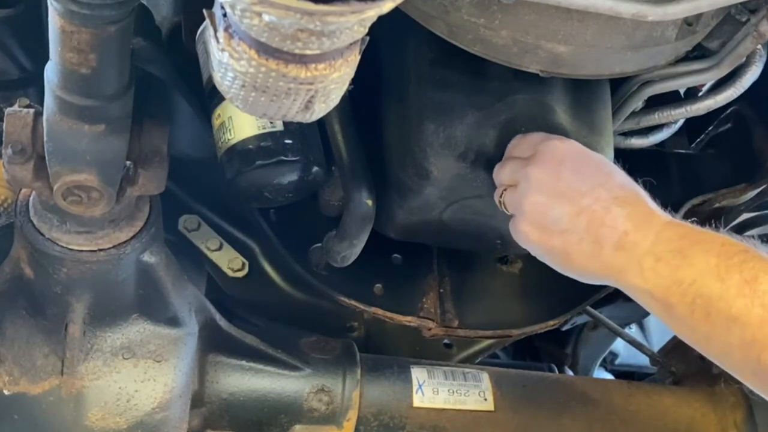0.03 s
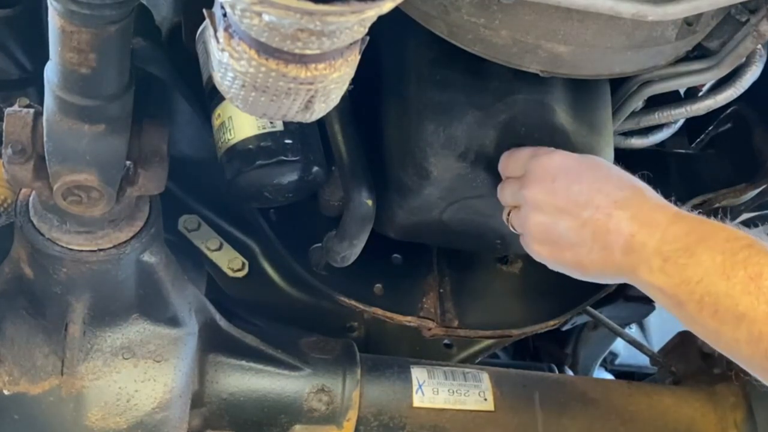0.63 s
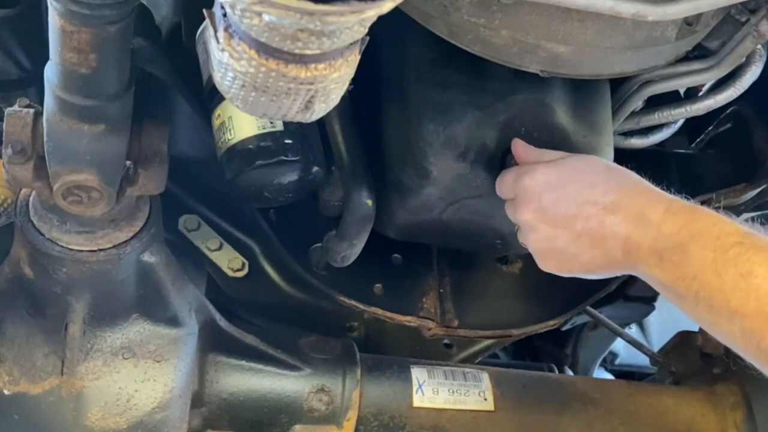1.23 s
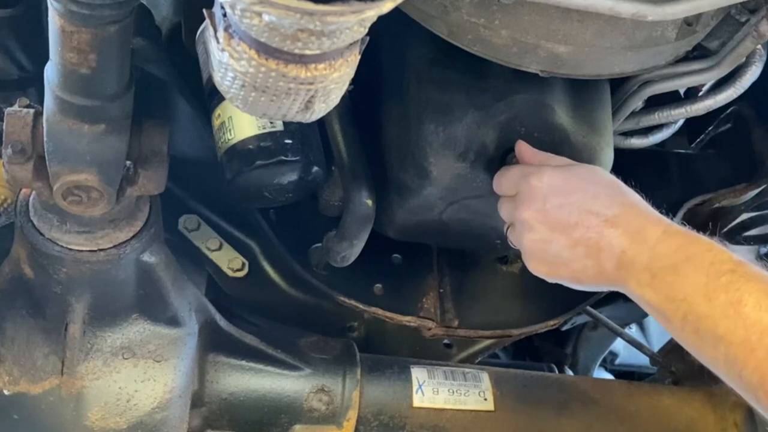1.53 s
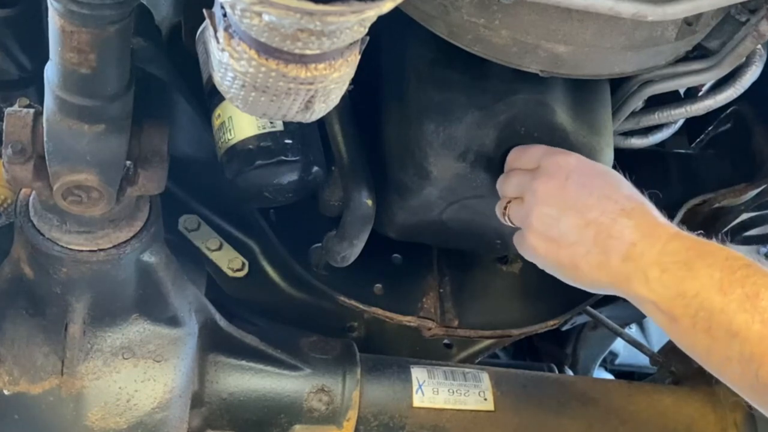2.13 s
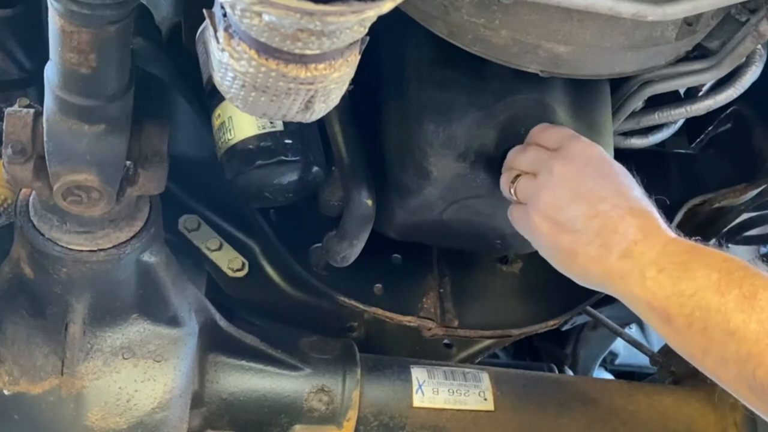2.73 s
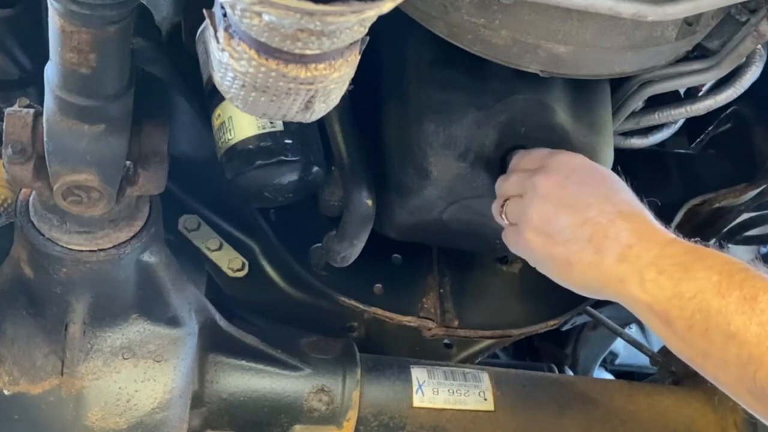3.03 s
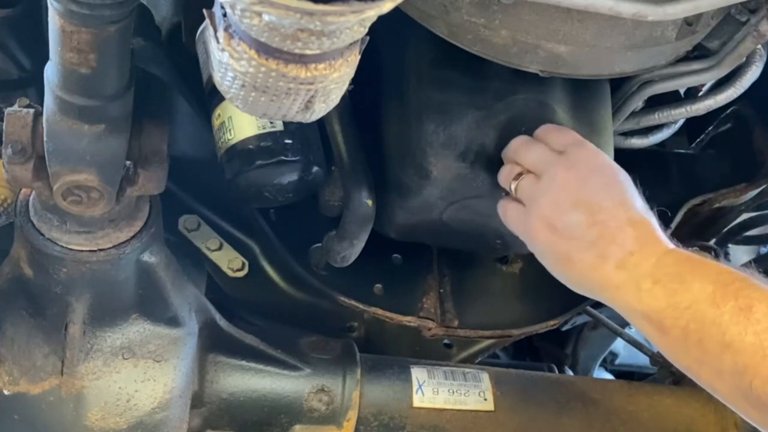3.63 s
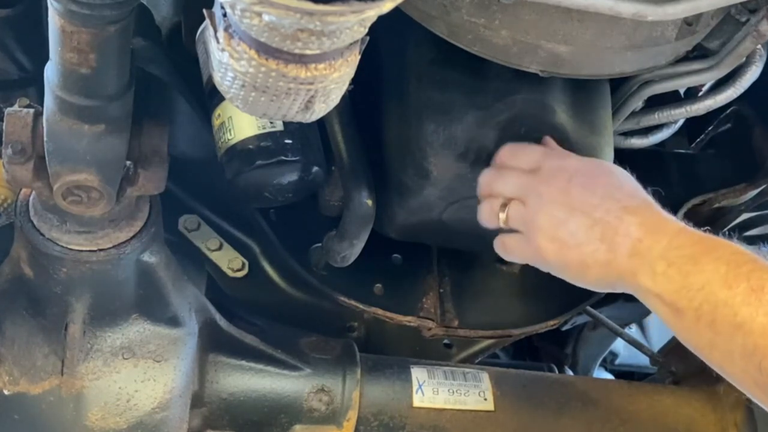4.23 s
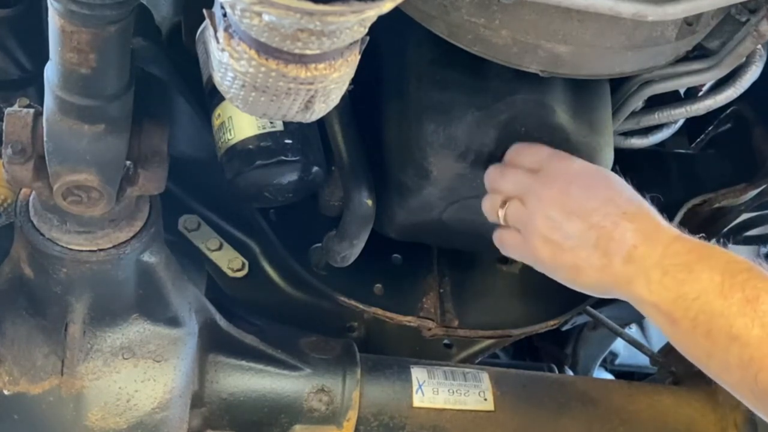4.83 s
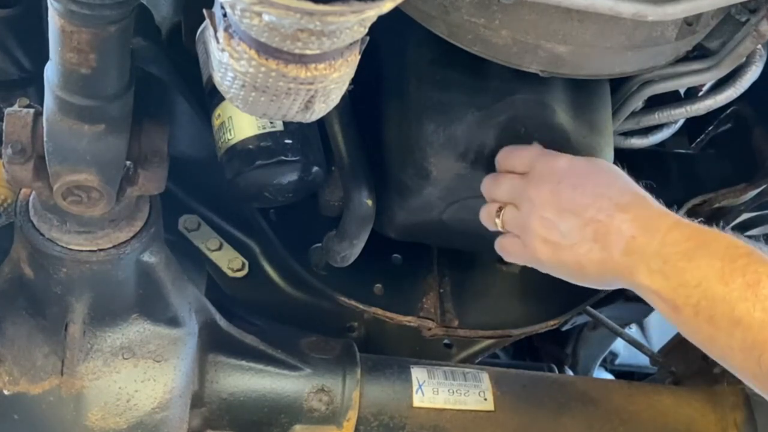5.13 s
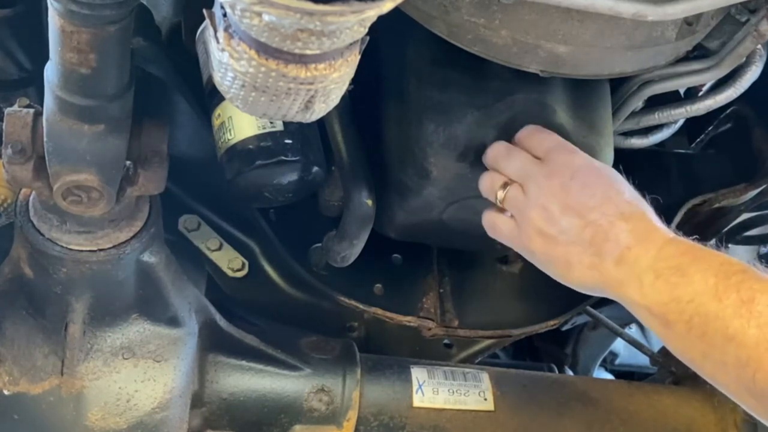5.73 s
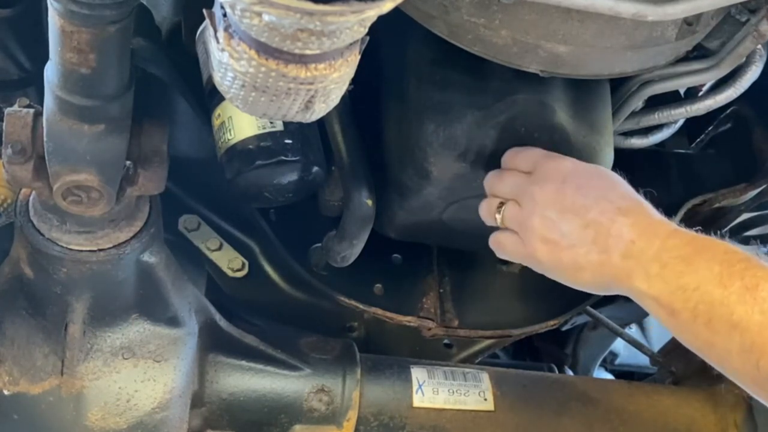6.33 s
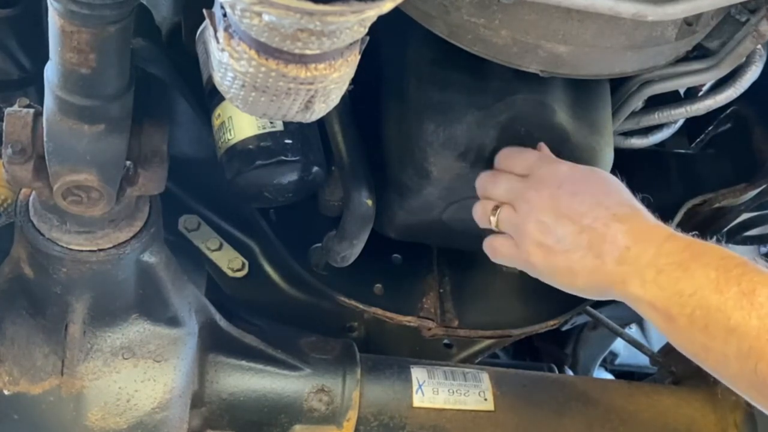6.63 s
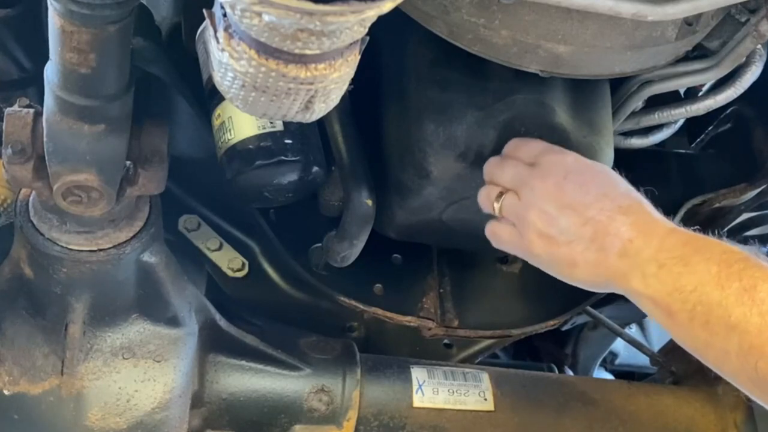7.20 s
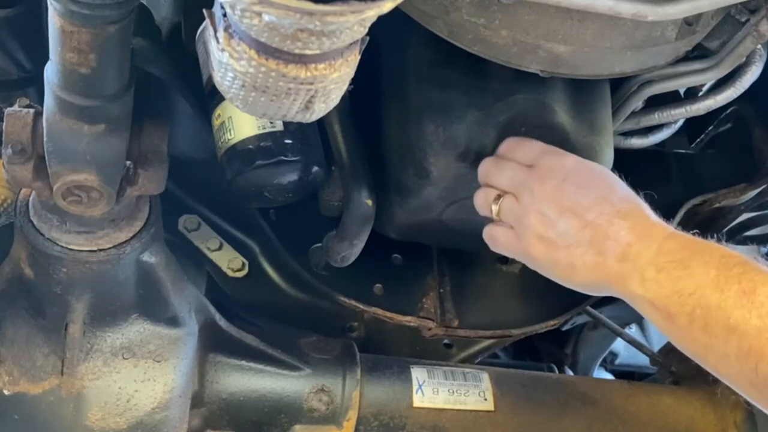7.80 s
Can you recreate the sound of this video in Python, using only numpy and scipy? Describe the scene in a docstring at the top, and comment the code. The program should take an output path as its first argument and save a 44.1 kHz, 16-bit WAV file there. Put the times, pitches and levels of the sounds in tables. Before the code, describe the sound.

Irregular metal clacks, grinding and skin rubbing as a hand unscrews an oil pan's drain plug outdoors, with a faint bird late.

```python
"""A gritty scrape and a brush of skin, then clacks and ringing steel: under a truck, fingers spin a loose
drain plug out of the oil pan, a twist about every 0.4 s. The plug rocks in its thread, and each impact
excites the damped modes of plug and pan; friction in the thread drives the same modes as a grinding.
Behind it are a low outdoor rumble, the growing rush of a far road and a small bird that whistles
three times near the end."""
import sys
import numpy as np
from scipy import signal
from scipy.fft import rfft, irfft
from scipy.io import wavfile

SR = 44100
rng = np.random.default_rng(int(sys.argv[2]) if len(sys.argv) > 2 else 0)


def unload_wav(signal):
    """Save mono or channel-first audio to the path in sys.argv[1] as 16-bit WAV at rate SR, clipped to [-1, 1]."""
    wavfile.write(
        sys.argv[1],
        SR,
        np.round(np.clip(np.atleast_2d(signal).T, -1, 1) * 32767).astype(np.int16),
    )


N = 351036
TIME = np.arange(N) / SR
RING_TIME = TIME[:SR // 4]

# Impacts of the plug; all levels in the tables are relative: (time [s], thud [dB], ring [dB], clack [dB])
KNOCKS = [(0.656, -71, -41, -62), (0.735, -65, -46, -74), (1.073, -43, -38, -50.5),
          (1.087, -39, -33.5, -45), (1.126, -37, -38.5, -45.5), (1.4318, -33.5, -34.5, -27.5),
          (1.566, -44, -38.5, -52), (1.624, -50, -43.5, -55), (1.8948, -40, -30, -34.5),
          (1.96, -67, -37, -50.5), (2.025, -46, -41, -66), (2.18, -50, -45.5, -55), (2.4, -54, -43.5, -66),
          (2.611, -44, -49.5, -72), (2.874, -67, -46, -70.5), (2.946, -42.5, -44.5, -43.5),
          (3.002, -35.5, -35.5, -42.5), (3.382, -51, -51, -57), (3.42, -55, -40, -53),
          (3.54, -57, -55, -58.5), (3.643, -48, -57.5, -54.5), (3.697, -65, -44, -70),
          (3.895, -45, -42, -45.5), (3.932, -41.5, -41.5, -50.5), (3.958, -57, -41, -40),
          (4.03, -48, -48.5, -57), (4.078, -41, -35, -42.5), (4.334, -47, -46, -47),
          (4.386, -44, -37, -50.5), (4.42, -58, -39, -40.5), (4.464, -38, -45, -35),
          (4.729, -55, -47.5, -67.5), (4.811, -57, -37.5, -46.5), (4.86, -47, -42.5, -43.5),
          (5.132, -49.5, -43.5, -65), (5.164, -67, -53.5, -62), (5.214, -42, -42.5, -64),
          (5.256, -48, -45, -79), (5.296, -48, -52, -80), (5.317, -62, -56, -62), (5.558, -51, -45.5, -59),
          (5.634, -49, -52, -55), (5.68, -37.5, -41, -50), (6.059, -50, -39, -56), (6.282, -63, -50, -64.5),
          (6.333, -51.5, -42, -57.5), (6.702, -54, -49, -64.5), (7.665, -60, -50.5, -58.5)]
# A glancing knock skids longer than a hard one: (clack level [dB], decay time constant [s])
SKID_DECAY = [(-69, 0.0075), (-44.5, 0.0029), (-27, 0.0015)]
# Normal modes of the pan, and of the plug with its boss: (frequency [Hz], level [dB], T60 [s])
PAN_MODES = [(447, 0, .22), (519, -7, .18), (586, -3, .22), (672, -6, .15), (745, 0, .13), (777, 1, .27),
             (833, -3, .25), (895, -6, .21), (1013, -8, .18), (1045, -9, .14), (1096, -12, .16),
             (1224, -7, .19), (1290, -13, .16), (1360, -10, .2), (1571, -18, .14), (1703, -16, .14),
             (1900, -17, .1)]
PLUG_MODES = [(2606, -9, .12), (2790, -6, .045), (2855, -6, .05), (3064, -1, .08), (3188, -2, .07),
              (3265, 0, .04), (3360, -2, .045), (3543, -6, .05), (3705, -9, .05), (3995, -10, .05)]
# Dense underbody ringing for each part of a knock: (frequency [Hz], spectral level [dB])
THUD_SPECTRUM = [(180, -22.5), (350, -22.5), (450, 5.5), (580, -2.5), (800, -23)]
RING_SPECTRUM = [(450, -26), (650, -6), (780, -3), (950, -12)]
CLANG_SPECTRUM = [(950, 2.5), (1250, -13), (1600, -11.5), (2000, -15.5), (2700, -40.5)]
CLACK_SPECTRUM = [(1200, -21), (2200, -11.5), (3100, 1), (3600, -7), (4500, -7.5), (6000, -35)]
TICK_SPECTRUM = [(3200, -23), (4800, 3.5), (6500, 6), (8500, -4), (11300, 0.5), (13200, -23), (14500, -14),
                 (16000, -23)]
# Reverberation time of the underbody: (frequency [Hz], T60 [s])
UNDERBODY_T60 = [(400, 0.37), (1000, 0.16), (2800, 0.12), (7000, 0.077), (14000, 0.12)]
# Finger strokes on the plug: (start [s], duration [s], skin level [dB], grinding level [dB])
TWISTS = [(0.023, .04, -70.5, -51), (0.456, 0.063, -75.5, -48), (0.609, 0.04, -59.5, -43.5),
          (0.725, 0.059, -71.5, -47.5), (1.042, 0.11, -66, -42.5), (1.416, 0.074, -67, -37.5),
          (1.542, 0.26, -74.5, -47.5), (1.896, 0.059, -67.5, -35), (2.022, 0.044, -63.5, -46),
          (2.181, 0.016, -59.5, -37.5), (2.354, 0.061, -67.5, -41.5), (2.48, 0.41, -76.5, -52.5),
          (2.979, 0.21, -66, -45), (3.389, 0.24, -66.5, -43.5), (3.92, 0.18, -59, -41),
          (4.382, 0.11, -60.5, -38), (4.786, .075, -52.5, -36), (5.186, 0.097, -61.5, -42),
          (5.603, 0.07, -56.5, -40), (5.954, 0.1, -59.5, -47), (6.345, 0.092, -63.5, -49.5),
          (6.78, 0.054, -63, -50.5), (7.18, 0.09, -66, -48), (7.553, 0.11, -67.5, -47),
          (7.938, .05, -68, -54)]
# Slides of a dry palm: (start [s], duration [s], level [dB])
PALM_SLIDES = [(1.04, 0.077, -69), (1.22, 0.18, -66), (1.56, 0.19, -72.5), (1.76, 0.18, -69)]
# Friction noise of fingers and palm on metal: (frequency [Hz], spectral level [dB])
SKIN_SPECTRUM = [(900, -8.5), (2000, 0.5), (3000, 9.5), (4500, -2.5), (6800, -1.5), (9000, -8), (11500, -6),
                 (13500, -11), (16000, -15)]
PALM_SPECTRUM = [(4000, -5.5), (7500, -2), (11000, -6), (14500, 1), (17000, -9.5)]
# Songs: (start [s], high whistle duration [s], its level [dB], pitch fall of both whistles [fraction])
SONGS = [(6.853, .045, -61, 0.021), (7.235, .05, -53.5, 0.027), (7.698, 0.056, -54, 0.0383)]
# Raspy calls of other birds: (start [s], duration [s], first pitch [Hz], last pitch [Hz], level [dB])
BIRD_CALLS = [(2.48, 0.166, 3560, 3610, -68.5), (7.575, .021, 5800, 6800, -63.5)]
# Outdoor rumble and far road: (frequency [Hz], spectral level [dB])
RUMBLE_SPECTRUM = [(18, -37), (30, -19), (48, -5), (66, 2), (82, -2), (102, -3), (125, -9), (170, -14.5),
                   (280, -17.5), (400, -21)]
ROAD_SPECTRUM = [(200, -12), (330, -12), (450, 1), (600, 3.5), (800, 6), (1200, 5), (1700, -3),
                 (2500, -13.5), (4000, -30.5), (7000, -59.5), (15000, -57)]
# Their slow growth: (time [s], level [dB])
RUMBLE_LEVEL = [(0, -50), (2.2, -50), (3.3, -47), (6.4, -49), (6.9, -47), (7.4, -47), (7.96, -44.5)]
ROAD_LEVEL = [(0, -58), (1, -56), (3, -54), (5, -53), (6.5, -51), (7.3, -48.5), (7.96, -51)]
# Likeness of left and right in noise: (frequency [Hz], coherence [0-1])
COHERENCE = [(60, 1), (130, 0.87), (500, 0.28), (1200, 0.057), (3000, 0.47), (6000, 0.94), (15000, 1)]
# Phase difference of near sounds: (frequency [Hz], lead of the left [rad])
NEAR_PHASE = [(0, 0), (6900, 0), (8400, 1.3), (9200, 3.1), (9900, 4.9), (11200, 6.3), (12600, 7.7),
              (13500, 9.4), (14300, 11), (15700, 12.6)]
# Level difference of near sounds: (frequency [Hz], left minus right [dB])
NEAR_BALANCE = [(60, 6), (200, -4), (380, -1), (700, -3), (1300, 2), (2400, 1), (4400, 2.5), (8000, 1),
                (15000, -0.5)]

FLEX_HZ, CLANG_HZ = 630, 950   # pan modes: thud of the flexing bottom below, ring between, clang above
CLANG_DB, CLANG_PER_CLACK = -0.5, 0.32   # a harder clack wakes more of the pan's high modes
TICK_DB, TICK_PER_GRIP, FIRM_GRIP_DB = -8, 0.52, -60   # a firmer grip brightens the knock
# Stroke envelopes: (attack [dB/s], rise over the stroke [dB], release [dB/s])
SKIN_SHAPE, GRIND_SHAPE, PALM_SHAPE = (390, 0.74, 364), (400, 0.89, 260), (100, 8.3, 250)
HIGH_HZ, LOW_HZ = 3956, 2892
CHIP_FROM_HZ, CHIP_TO_HZ, CHIP_S, CHIP_DB = 6300, 5200, .026, -9.5   # level against the high whistle
LOW_DELAY_S, LOW_S, LOW_DB = 0.0883, 0.18, -56
WHISTLE_WAVER, CHIP_WAVER = 0.0032, 0.057   # fractions of pitch
PULSE_HZ, PULSE_DEPTH = 21, 0.6
CUTOFF_HZ = 15800


def plug_knocks(places, grip_db):
    """Impact excitation: an impulse and a skid of micro-impacts are convolved with each response."""
    out, t = np.zeros((2, N)), RING_TIME[:SR // 40]
    trims_db = (-2.6, -0.6, -0.19, -0.35, -0.3)
    skid_shares = (0.36, 0.22, 0.18, 0.34, 1.0)   # the skid roughens every part, the bright tick most
    for k, (s, thud_db, ring_db, clack_db) in enumerate(KNOCKS):
        clang_db = ring_db + CLANG_DB + CLANG_PER_CLACK * (clack_db - ring_db)
        tick_db = clack_db + TICK_DB + TICK_PER_GRIP * (grip_db[int(s * SR)] - FIRM_GRIP_DB)
        levels_db = np.add((thud_db, ring_db, clang_db, clack_db, tick_db), trims_db)
        micro_impacts = rng.standard_normal(len(t)) * (rng.random(len(t)) < 4000 / SR)
        skid = micro_impacts * np.exp(-t / lookup(SKID_DECAY, clack_db))
        for response, level_db, share in zip(places[k % len(places)], levels_db, skid_shares):
            force = (t == 0) + share * skid
            hit = signal.fftconvolve(response, force[None], axes=1)
            add(out, s, hit * from_db(level_db) / np.std(hit[:, :len(t)]))
    return out


def contact_responses():
    """Impulse responses at one contact point: the pan's thud, ring and clang, the plug's clack and tick."""
    low = [m for m in PAN_MODES if m[0] < FLEX_HZ]
    middle = [m for m in PAN_MODES if FLEX_HZ <= m[0] < CLANG_HZ]
    high = [m for m in PAN_MODES if m[0] >= CLANG_HZ]
    thud = ringing(low, spread_rad=.25) + from_db(-2.5) * underbody(THUD_SPECTRUM)
    ring = ringing(middle, spread_rad=.33) + from_db(-11) * underbody(RING_SPECTRUM)
    clang = ringing(high, spread_rad=.33) + from_db(-1.5) * underbody(CLANG_SPECTRUM)
    clack = ringing(PLUG_MODES, spread_rad=.25) + underbody(CLACK_SPECTRUM)
    swell = 1 - np.exp(-RING_TIME / 0.0019)   # sheet steel takes a moment to move
    contact = 1 - np.exp(-RING_TIME / 0.0004)
    return (thud * swell ** 3 * direct_sound(0.17, 0.057),
            ring * swell * direct_sound(0.68, 0.011),
            clang * swell * direct_sound(0.82, 0.033),
            clack * contact * direct_sound(2.0, 0.002),
            underbody(TICK_SPECTRUM) * direct_sound(1.7, 0.0037))


def ringing(modes, spread_rad):
    """Modal superposition: damped sinusoids, each shifted in phase oppositely at the two ears."""
    hz, level_db, t60 = np.transpose(modes)[:, :, None]
    ears = np.array([1, -1])[:, None, None]
    phase = rng.uniform(0, 2 * np.pi, hz.shape) + spread_rad * rng.choice([-1, 1], hz.shape) * ears
    decay = from_db(level_db - 60 * RING_TIME / t60)
    return rms_one(np.sum(decay * np.sin(2 * np.pi * hz * RING_TIME + phase), axis=1))


def underbody(spectrum):
    """Reverberation between frame, pan and ground: noise whose low bands decay most slowly."""
    size = len(RING_TIME)
    noise = rfft(stereo_noise(spectrum, size))
    log_hz = np.log(np.fft.rfftfreq(size, 1 / SR) + 1)
    centres, t60s = np.transpose(UNDERBODY_T60)
    bands = [irfft(noise * np.interp(log_hz, np.log(centres), share), size) for share in np.eye(len(t60s))]
    return rms_one(sum(band * from_db(-60 * RING_TIME / t60) for band, t60 in zip(bands, t60s)))


def direct_sound(boost, seconds):
    """Direct-to-reverberant ratio: a brief gain lifts the onset above the reflections."""
    return 1 + boost * np.exp(-RING_TIME / seconds)


def thread_grinding(responses, grind_db):
    """Forced vibration: grit in the thread drives the modes of pan and plug."""
    thud, ring, clang, clack, _ = responses
    body = from_db(-1) * thud + ring + from_db(-6) * clang + from_db(-20) * clack
    grit = catches(per_s=990, uneven_db=4) * from_db(grind_db - 5.5)
    return driven(body, grit)


def skin_friction(responses, skin_db):
    """Sliding friction: fingers hiss and catch on the metal, and the palm adds a smooth, bright hiss."""
    *_, clack, tick = responses
    force = catches(per_s=170, uneven_db=5) * from_db(skin_db - 10.5)
    crackle = driven(tick + from_db(-8.5) * clack, force)
    hiss = stereo_noise(SKIN_SPECTRUM, N)
    flicker_db = 2.5 * drift(per_s=230) + 3.7 * drift(per_s=31)
    fingers = hiss * from_db(skin_db - 2.26 + flicker_db)
    palm_db = stroke_level(PALM_SLIDES, PALM_SHAPE, rest_db=-100)
    return crackle + fingers + from_db(palm_db) * stereo_noise(PALM_SPECTRUM, N)


def catches(per_s, uneven_db):
    """Stick-slip force as a Poisson process: tiny impulses of uneven size at random moments."""
    sizes = from_db(uneven_db * np.minimum(rng.exponential(1, N), 4)) * rng.choice([-1, 1], N)
    return rms_one(sizes * (rng.random(N) < per_s / SR))


def driven(response, force):
    """Linear response: a running force convolved with an impulse response of unit energy."""
    return signal.fftconvolve(rms_one(response) / np.sqrt(len(RING_TIME)), force[None], axes=1)[:, :N]


def stroke_level(rows, shape, rest_db):
    """Exponential envelopes, in dB: each stroke swells, presses on and falls back to the resting level."""
    attack, press, release = shape
    level = np.full(N, float(rest_db))
    for s, length, stroke_db in rows:
        t = TIME - s
        edges = attack * np.minimum(t, 0) - release * np.maximum(t - length, 0)
        level = np.maximum(level, stroke_db + press * (np.clip(t / length, 0, 1) - .5) + edges)
    return level


def near_image(x):
    """Stereo cues: near sounds differ between left and right in phase and level, varying with frequency."""
    hz = np.fft.rfftfreq(N, 1 / SR) + 1
    lead = lookup(NEAR_PHASE, hz)
    lean = from_db(at_hz(NEAR_BALANCE, hz) / 2)
    return irfft(rfft(x) * np.array([lean, np.exp(-1j * lead) / lean]), N)


def bird_notes():
    """Linear pitch glides: the lone calls, and for each song a high whistle, a chip and a low whistle."""
    notes = [(*call, CHIP_WAVER) for call in BIRD_CALLS]
    for s, high_s, high_db, sag in SONGS:
        notes += [(s, high_s, HIGH_HZ, HIGH_HZ * (1 - sag), high_db, WHISTLE_WAVER),
                  (s + high_s, CHIP_S, CHIP_FROM_HZ, CHIP_TO_HZ, high_db + CHIP_DB, CHIP_WAVER),
                  (s + LOW_DELAY_S, LOW_S, LOW_HZ, LOW_HZ * (1 - sag), LOW_DB, WHISTLE_WAVER)]
    return notes


def birds():
    """Modulated tones: amplitude modulation makes them flutter, random frequency modulation adds rasp."""
    song, waver = np.zeros(N), drift(per_s=4100)
    for s, length, start_hz, end_hz, level_db, rough in bird_notes():
        along = np.linspace(0, 1, int(length * SR))
        glide_hz = start_hz + (end_hz - start_hz) * along
        hz = glide_hz * (1 + rough * np.roll(waver, -int(s * SR))[:len(along)])
        swell = np.abs(np.sin(np.pi * along ** 0.36)) ** 0.3   # a quick rise, a slower end
        flutter = 1 - PULSE_DEPTH * np.cos(2 * np.pi * PULSE_HZ * length * along)
        add(song, s, from_db(level_db) * swell * flutter * np.sin(2 * np.pi * np.cumsum(hz) / SR))
    return song * from_db(2 * drift(per_s=73))


def yard_reverb(song, truck_t60=0.15, yard_t60=0.94):
    """Double-slope decay: sound is smeared briefly under the truck and echoed faintly by the yard."""
    t = TIME[:SR // 2]
    decay = from_db(-60 * t / truck_t60) + from_db(-18.5 - 60 * t / yard_t60)
    scatter = rms_one(rng.standard_normal((2, len(t))) * decay) / np.sqrt(len(t))
    echoes = signal.fftconvolve(song[None], scatter, axes=1)[:, :N]
    return from_db(-1.5) * song + from_db(4) * echoes


def outdoors():
    """Ambient noise with a slowly varying level: a lumpy low rumble and the smooth rush of far tyres."""
    rumble_db = lookup(RUMBLE_LEVEL, TIME) + .8 * drift(per_s=11)
    rumble = from_db(rumble_db) * stereo_noise(RUMBLE_SPECTRUM, N)
    road_db = lookup(ROAD_LEVEL, TIME) + .29 * drift(per_s=13)
    return rumble + from_db(road_db) * stereo_noise(ROAD_SPECTRUM, N)


def stereo_noise(spectrum, size):
    """Partial coherence: shaped noise, alike at both ears in bass and treble, unlike in the middle."""
    hz = np.fft.rfftfreq(size, 1 / SR) + 1e-3
    coherence = np.clip(at_hz(COHERENCE, hz), -.999, .999)
    mid, side = rfft(rng.standard_normal((2, size)))
    skirts = 1 / np.sqrt((1 + (spectrum[0][0] / hz) ** 8) * (1 + (hz / spectrum[-1][0]) ** 8))
    pair = np.sqrt(1 + coherence) * mid + np.sqrt(1 - coherence) * side * [[1], [-1]]
    return rms_one(irfft(pair * from_db(at_hz(spectrum, hz)) * skirts, size))


def drift(per_s):
    """Random fluctuation: per_s Gaussian values a second, joined by straight lines."""
    return np.interp(TIME * per_s, np.arange(N // 10), rng.standard_normal(N // 10))


def from_db(db):
    """Amplitude ratio of a level in decibels."""
    return 10 ** (np.asarray(db) / 20)


def rms_one(x):
    """Normalisation to an rms of 1."""
    return x / np.sqrt(np.mean(x ** 2) + 1e-20)


def lookup(table, x):
    """Linear interpolation in a two-column table."""
    return np.interp(x, *np.transpose(table))


def at_hz(table, hz):
    """Interpolation on a logarithmic frequency axis."""
    frequencies, values = np.transpose(table)
    return np.interp(np.log(hz), np.log(frequencies), values)


def add(out, s, sound):
    """Superposition of a sound starting at s seconds."""
    start = int(round(s * SR))
    out[..., start:start + sound.shape[-1]] += sound[..., :N - start]


def scene():
    """Superposition of the hand's work close by and the outdoors behind it."""
    places = [contact_responses() for _ in range(4)]   # contact points on the thread
    twists = np.array(TWISTS)
    skin_db = stroke_level(twists[:, [0, 1, 2]], SKIN_SHAPE, rest_db=-83)
    grind_db = stroke_level(twists[:, [0, 1, 3]], GRIND_SHAPE, rest_db=-58)
    knocks = plug_knocks(places, grip_db=skin_db)
    friction = thread_grinding(places[0], grind_db) + skin_friction(places[0], skin_db)
    return near_image(knocks + friction) + outdoors() + yard_reverb(birds())


def record(dry):
    """Band limiting: an elliptic low-pass filter cuts the highest treble steeply."""
    return signal.sosfilt(signal.ellip(10, .1, 80, CUTOFF_HZ, fs=SR, output="sos"), dry)


dry = scene()
out = record(dry)
unload_wav(out)
```